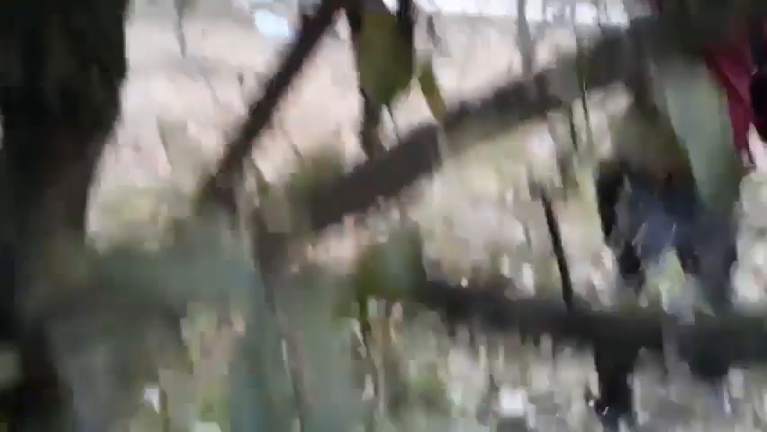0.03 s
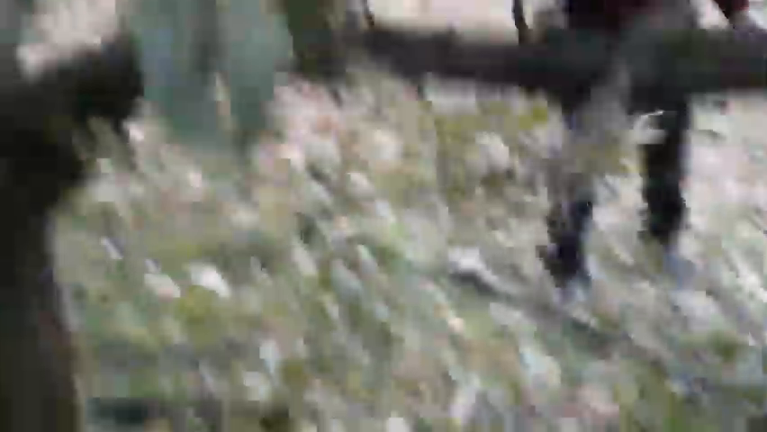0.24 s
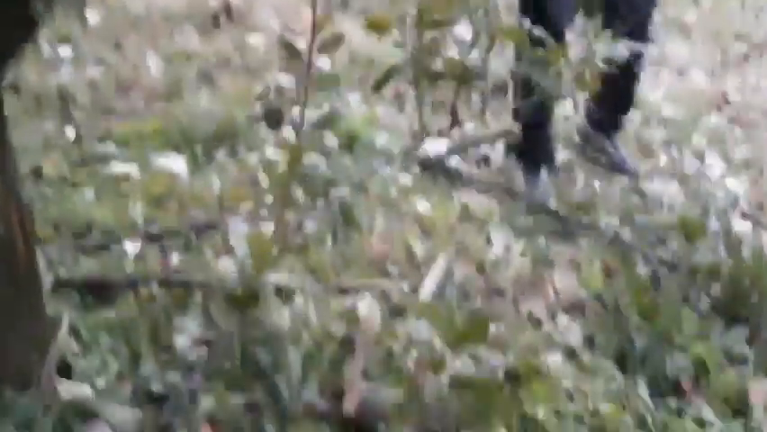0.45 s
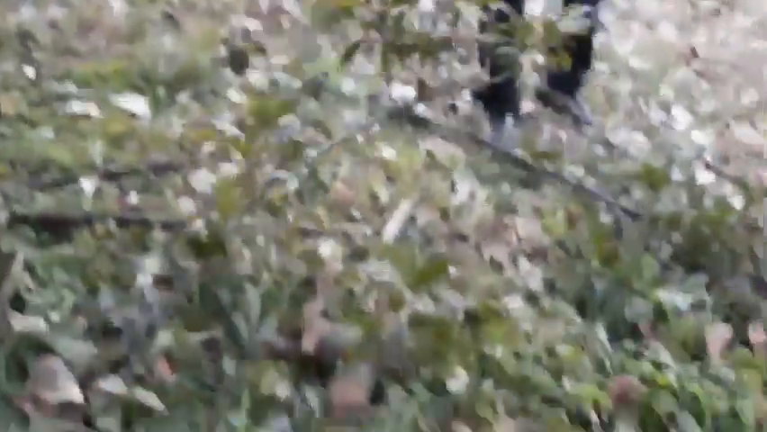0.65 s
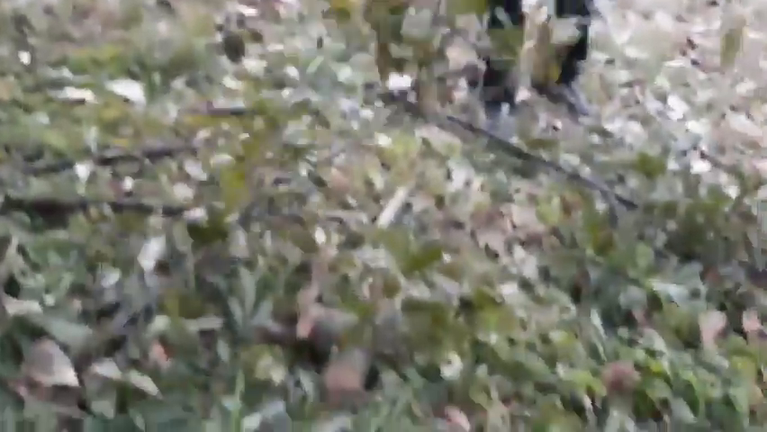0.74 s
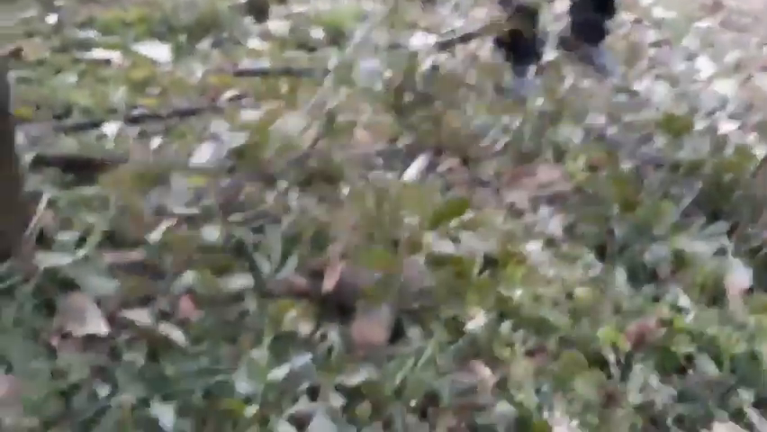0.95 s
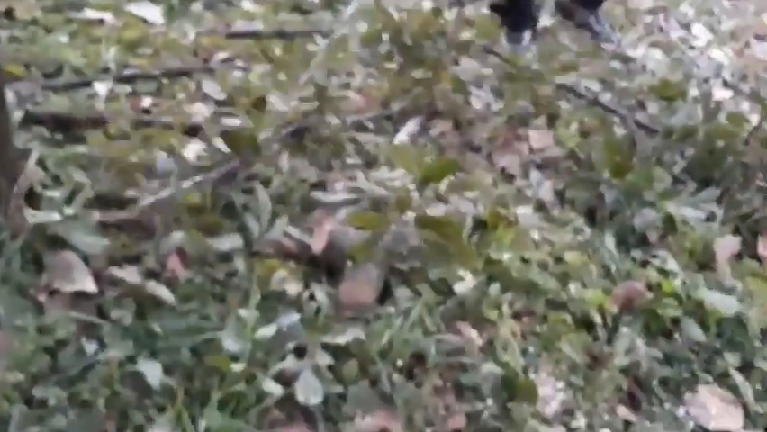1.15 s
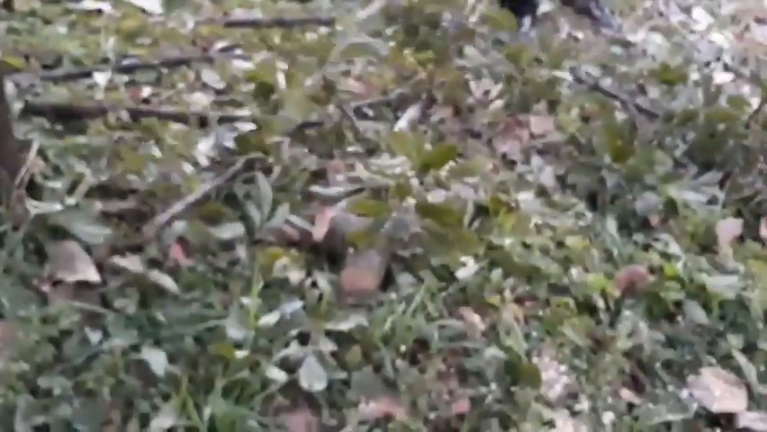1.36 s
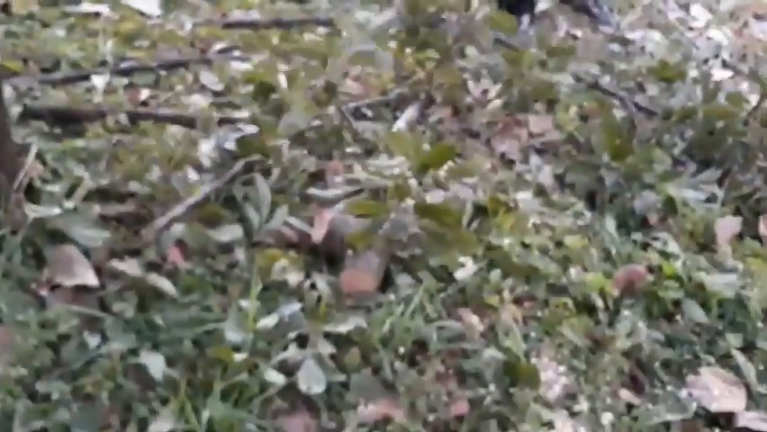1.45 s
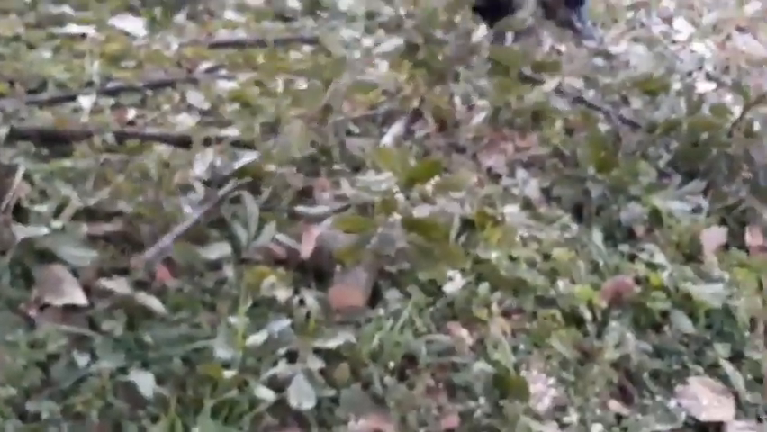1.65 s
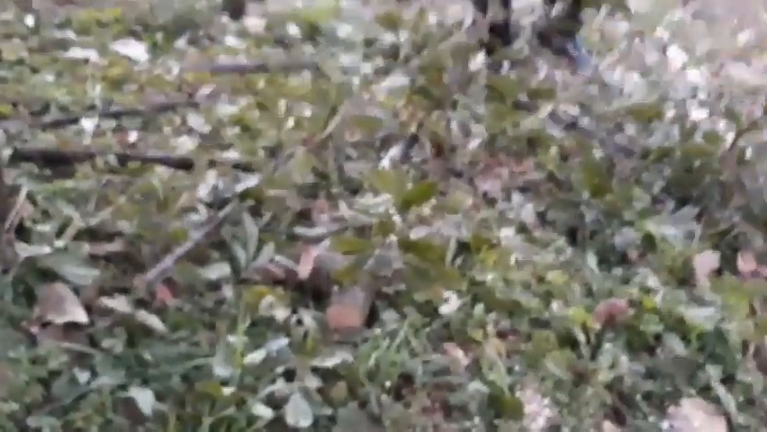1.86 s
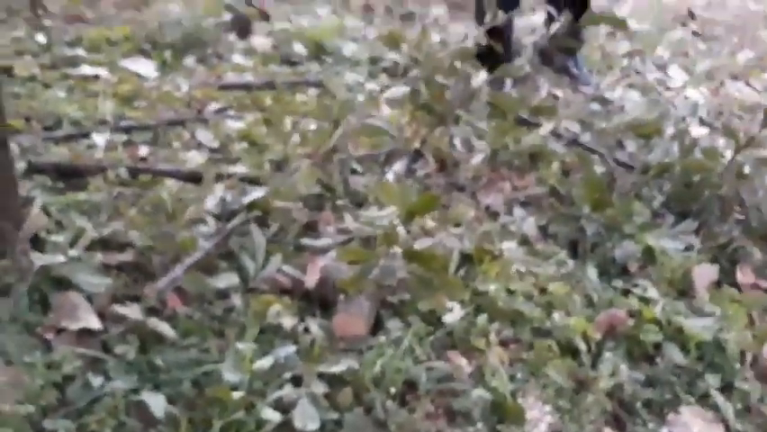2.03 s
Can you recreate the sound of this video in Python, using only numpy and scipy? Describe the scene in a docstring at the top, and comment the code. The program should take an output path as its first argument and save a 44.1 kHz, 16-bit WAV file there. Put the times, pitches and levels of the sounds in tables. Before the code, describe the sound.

Electric saw motor whines up from a click, rasps through wood, then winds down and clacks off

```python
"""Electric chain saw in an orchard

The trigger clicks; the chain winds up, bites into a branch, runs free and winds down to further clicks.
Chain and wood are noise puffs, one per link or tooth, through filters and resonances; the whine is sines.
Noise makes leaves, soft steps, a last dull click and background, wavering sines a low hum.
Both channels are identical."""
import sys
import numpy as np
from scipy import signal
from scipy.fft import rfft, irfft
from scipy.io import wavfile
from scipy.ndimage import map_coordinates

SR = 44100
rng = np.random.default_rng(int(sys.argv[2]) if len(sys.argv) > 2 else 0)


def put_to_file(sound):
    """Save the sound as 16-bit audio at rate SR, in the file named by the first command-line argument."""
    columns = np.atleast_2d(sound).T  # one column per channel
    safe = np.clip(columns, -1, 1)
    whole_steps = np.round(safe * 32767)
    wavfile.write(sys.argv[1], SR, whole_steps.astype(np.int16))


N = 92610


def undb(db):
    """Amplitude factor of a level in dB."""
    return 10 ** (np.asarray(db) / 20)


def unit(x):
    """Scale to an RMS of 1."""
    return x / np.sqrt(np.mean(x ** 2))


def clock():
    """Time of each sample in seconds."""
    return np.arange(N) / SR


def curve(rows):
    """Straight lines through (seconds, value) rows."""
    return np.interp(clock(), *np.array(rows).T)


def walk(rate_hz):
    """Smooth random wandering through knots of spread 1, rate_hz knots per second."""
    knots = rng.standard_normal(4096)
    return map_coordinates(knots, [clock() * rate_hz], order=3, mode="wrap")


def colour(x, points):
    """Minimum-phase filter through (Hz, dB) points that keeps the power of white noise."""
    hz, db = np.array(points).T
    size = 4096
    f = np.maximum(np.fft.rfftfreq(size, 1 / SR), 1)
    gain = undb(np.interp(np.log(f), np.log(hz), db))
    # fold the cepstrum to make the response causal
    cepstrum = irfft(np.log(gain))
    cepstrum[1:size // 2] *= 2
    cepstrum[size // 2 + 1:] = 0
    response = irfft(np.exp(rfft(cepstrum)))
    return signal.fftconvolve(x, response / np.linalg.norm(response))[:N]


def pulses(rate_hz, scatter_db, jitter_cycles):
    """One impact per cycle, uneven in size and in time."""
    turns = np.cumsum(rate_hz) / SR
    size, late = rng.standard_normal((16000, 2))[:int(turns[-1])].T
    at = np.interp(np.arange(len(size)) + jitter_cycles * late, turns, np.arange(N))
    return np.bincount(at.astype(int), undb(scatter_db * np.minimum(size, 2)), N)


def puffs(hits, decay_s):
    """A short burst of noise after each impact, at unit level overall."""
    envelope = signal.lfilter([1], [1, -np.exp(-1 / (decay_s * SR))], hits)
    return unit(envelope * rng.standard_normal(N))


def bursts(rows):
    """Noise that starts sharply and dies away for each (start s, dB, decay s) row."""
    t = clock()
    envelope = sum(undb(db) * (t >= s) * np.exp(-np.abs(t - s) / decay_s) for s, db, decay_s in rows)
    return rng.standard_normal(N) * envelope


def ring(x, hz, width_hz):
    """One resonance, at unit level."""
    return unit(signal.lfilter(*signal.iirpeak(hz, hz / width_hz, SR), x))


# Distant background colour. Each row: frequency in Hz, gain in dB.
AIR_COLOUR = [(25, -19), (50, -11), (75, 2), (120, -1.5), (180, -1), (260, -6.5), (500, -6), (1000, -19.5),
              (4000, -21)]
AIR_DB = -48


def background():
    """Steady coloured noise."""
    return undb(AIR_DB) * colour(rng.standard_normal(N), AIR_COLOUR)


# Distant hum. Each row: frequency in Hz, mean level in dB.
HUM_TONES = [(71, -56), (87, -59), (143, -63), (214, -60)]


def hum():
    """Low sines that waver in level and phase."""
    out = np.zeros(N)
    for hz, db in HUM_TONES:
        level = np.sqrt(2) * undb(db + 2 * walk(9.2))
        out += level * np.sin(2 * np.pi * hz * clock() + .6 * walk(5.1))
    return out


# Crisp leaves. Each row: start in seconds, level in dB, decay in seconds.
CRUNCHES = [(.015, -42, .004), (.036, -41, .004), (.071, -36, .007), (.122, -41, .005), (1.925, -42, .004),
            (2.015, -46, .015)]
# Leaf colour. Each row: frequency in Hz, gain in dB.
LEAF_COLOUR = [(300, -4.5), (600, -2.5), (1200, -3), (3200, -5.5), (4600, 1), (6000, 2.5), (7800, -3),
               (9800, -32.5), (13000, -11.5), (15500, -33)]
LEAVES_DB, LEAF_SWELL_DB, LEAF_SWELL_HZ = -44, 1.2, 25.77
LEAF_RATE_HZ, LEAF_SCATTER_DB, LEAF_JITTER_CYCLES, LEAF_DECAY_S = 500., 3.5, .98, .0045


def leaves():
    """Many small irregular impacts rustle, with single crunches among them."""
    hits = pulses(np.full(N, LEAF_RATE_HZ), LEAF_SCATTER_DB, LEAF_JITTER_CYCLES)
    rustle = puffs(hits, LEAF_DECAY_S)
    swell = undb(LEAVES_DB + LEAF_SWELL_DB * walk(LEAF_SWELL_HZ))
    return colour(rustle * swell + bursts(CRUNCHES), LEAF_COLOUR)


# Soft steps in the undergrowth, and in the last row a short, dull click.
# Each row: start in seconds, level in dB, decay in seconds.
STEPS_AND_LAST_CLICK = [(.02, -42.5, 0.06), (.066, -45, 0.0053), (.8, -38, 0.01), (2.092, -32, .003)]
# Colour of both. Each row: frequency in Hz, gain in dB.
DULL_COLOUR = [(60, -12), (200, -3), (420, 9), (800, -6), (2500, -29), (8000, -38)]


def steps_and_last_click():
    """Decaying noise bursts with a dull colour."""
    return colour(bursts(STEPS_AND_LAST_CLICK), DULL_COLOUR)


# Clicks of trigger and drive. Each row: start in seconds, level in dB, decay in seconds.
CLICKS = [(.146, -38, .004), (.1578, -15, .0035), (.164, -18, .003), (.1735, -24, .003),
          (1.833, -12.5, .0017), (1.8365, -22, .004)]
# Click colour. Each row: frequency in Hz, gain in dB.
CLICK_COLOUR = [(200, -20), (400, -9), (620, 1), (1400, -1), (2200, 4), (3500, 2), (6300, 0), (8500, -11),
                (10000, -20), (15000, -23)]
# Ring after each click. Each row: nominal frequency in Hz, level against the click in dB, T60 in seconds.
CLICK_RING = [(614, -22, .15), (5120, -20, .11), (12790, -23, .15)]


def trigger():
    """Sharp clacks at start and stop, each with a thin, slightly detuned metallic ring."""
    out = colour(bursts(CLICKS), CLICK_COLOUR)
    for s, db, _ in CLICKS:
        age_s = np.maximum(clock() - s, 0)
        for hz, mode_db, t60_s in CLICK_RING:
            mode_hz = hz * (1 + .003 * rng.standard_normal())
            decay = np.exp(-np.log(1000) * age_s / t60_s)
            out = out + undb(db + mode_db) * decay * np.sin(2 * np.pi * mode_hz * age_s)
    return out


# Chain rattle level. Each row: time in seconds, level in dB.
RATTLE_LEVEL = [(.18, -27), (.25, -24.5), (.34, -22.5), (.44, -21.5), (.56, -23), (.74, -22.5), (1.0, -20),
                (1.46, -20), (1.6, -23), (1.68, -24.5), (1.8, -29)]
# Rattle colour. Each row: frequency in Hz, gain in dB.
RATTLE_COLOUR = [(200, -28), (520, -18.5), (670, -12.5), (940, -8), (1090, -16.5), (1280, -12.5),
                 (1520, -13.5), (1850, -2), (2450, 2.5), (2950, -6.5), (4200, 0), (5200, 1), (6000, -0.5),
                 (7700, -1.5), (8800, -9.5), (10100, -19.5), (12800, -8.5), (15500, -22)]
# Resonances of housing and cover. Each row: frequency in Hz, width in Hz, level in dB before RATTLE_LEVEL.
HOUSING = [(671, 55, -24.5), (1295, 140, -22.5), (1927, 290, -9.5), (2670, 52, -30.5), (3645, 120, -20.5),
           (3920, 30, -17.5), (4596, 390, -16.5), (5040, 370, -12), (6440, 87, -16.5), (7320, 150, -22)]
LINK_SCATTER_DB, LINK_JITTER_CYCLES, KNOCK_DECAY_S = 2.5, .08, .0007
SLIDE_SHARE, CHATTER_DB, CHATTER_HZ = 1, .4, 134.2
FREE_HZ, BRIGHT_HZ, SLOW_DULL_DB = 819, 6900, -5  # treble above BRIGHT_HZ dulls below FREE_HZ


def rattle(rate_hz):
    """Links knock on the sprocket and slide along the bar, brighter with speed; the housing rings."""
    knocks = puffs(pulses(rate_hz, LINK_SCATTER_DB, LINK_JITTER_CYCLES), KNOCK_DECAY_S)
    slide = SLIDE_SHARE * rng.standard_normal(N)
    drive = unit(knocks + slide) * undb(CHATTER_DB * walk(CHATTER_HZ))
    housing = np.zeros(N)
    for hz, width_hz, db in HOUSING:
        scrambled = drive * rng.choice([-1, 1], N)  # random signs: the modes ring independently
        housing += undb(db) * ring(scrambled, hz, width_hz)
    noise = colour(drive, RATTLE_COLOUR)
    highpass = signal.butter(2, BRIGHT_HZ, "high", fs=SR, output="sos")
    treble = signal.sosfiltfilt(highpass, noise)
    treble_gain = undb(SLOW_DULL_DB * (1 - rate_hz / FREE_HZ))
    noise = noise + treble * (treble_gain - 1)
    return (noise + housing) * undb(curve(RATTLE_LEVEL))


# Sprocket whine. Each row: time in seconds, fundamental, second and third harmonic level in dB.
WHINE_LEVEL = [(.2, -64, -56, -60), (.265, -49, -47, -48), (.305, -34.5, -39, -39), (.42, -32, -34, -29.5),
               (.56, -32, -33, -31), (.80, -33.5, -44, -32), (.85, -41, -43, -28.5), (1.15, -37, -40, -27),
               (1.44, -40, -40, -30), (1.475, -30.5, -37, -32), (1.62, -34, -36, -31),
               (1.70, -33.5, -37, -34), (1.755, -48, -51, -52), (1.82, -66, -60, -62)]
# Shrill sixth harmonic. Each row: time in seconds, level in dB.
SHRILL_LEVEL = [(.36, -48), (.44, -29), (.605, -30), (.67, -39), (.9, -43), (1.45, -42), (1.55, -35),
                (1.615, -31), (1.68, -48)]
FIFTH_DB = -7.5  # against the third harmonic
FLUTTER_DB, FLUTTER_HZ = 2.0, 90


def whine(rate_hz):
    """Harmonics of the link rate: a clean fundamental under fluttering overtones."""
    phase = 2 * np.pi * np.cumsum(rate_hz) / SR
    times, *columns = np.array(WHINE_LEVEL).T
    first_db, second_db, third_db = (np.interp(clock(), times, db) for db in columns)
    overtones = [(2, second_db), (3, third_db), (5, third_db + FIFTH_DB), (6, curve(SHRILL_LEVEL))]
    tone = undb(first_db) * np.sin(phase)
    for k, db in overtones:
        level = undb(db + FLUTTER_DB * walk(FLUTTER_HZ))
        tone = tone + level * np.sin(k * phase + rng.uniform(0, 2 * np.pi))
    return np.sqrt(2) * tone


# Tearing wood colour. Each row: frequency in Hz, gain in dB.
WOOD_COLOUR = [(200, -20), (340, -26), (500, -10.5), (720, 3.5), (950, -3), (1130, -2), (1400, 5),
               (1750, 2), (2200, 2.5), (2750, -1), (3100, -7), (4500, -1.5), (7500, 2), (10100, -17.5),
               (12800, -11.5), (15500, -14)]
# Resonances of bar and branch. Each row: frequency in Hz, width in Hz, level against each other in dB.
BAR_MODES = [(389.3, 18, -5), (731, 25, -1.5), (1370, 190, -17), (2240, 110, 7), (2440, 120, 7),
             (3005, 150, 8), (3830, 21, 0)]
WOOD_DB, BAR_DB = -22, -25.5  # at a bite of 0 dB
TOOTH_SCATTER_DB, TOOTH_JITTER_CYCLES, TEAR_DECAY_S = 2.5, .07, .0019
JUDDER_DB, JUDDER_HZ = 1.3, 260


def cut(rate_hz, bite):
    """Every second link carries a tooth that tears the wood and rings bar and branch."""
    teeth = pulses(rate_hz / 2, TOOTH_SCATTER_DB, TOOTH_JITTER_CYCLES)
    teeth = teeth * undb(JUDDER_DB * walk(JUDDER_HZ))
    tear = puffs(teeth, TEAR_DECAY_S)
    drive = tear + .5 * unit(teeth)
    body = sum(undb(db) * ring(drive, hz, width_hz) for hz, width_hz, db in BAR_MODES)
    return bite * (undb(WOOD_DB) * colour(tear, WOOD_COLOUR) + undb(BAR_DB) * unit(body))


TREES_DB, TREES_DECAY_S, TREES_LAG_S = -11, .022, .004


def trees(x):
    """A brief scatter from the ground and nearby trunks: a decaying noise response added to the sound."""
    t = clock()[:SR // 5]
    echoes = rng.standard_normal(len(t)) * (t > TREES_LAG_S) * np.exp(-t / TREES_DECAY_S)
    return x + undb(TREES_DB) * signal.fftconvolve(x, echoes / np.linalg.norm(echoes))[:N]


# Nominal chain speed. Each row: time in seconds, links over the sprocket per second.
CHAIN_SPEED = [(.16, 270), (.2, 400), (.25, 525), (.306, 625), (.39, 775), (.422, 811), (.53, 819),
               (.79, 818), (.82, 805), (.885, 794), (.935, 812), (1.01, 792), (1.2, 804), (1.33, 809),
               (1.42, 812), (1.468, 851), (1.6, 831), (1.626, 812), (1.696, 662), (1.742, 570),
               (1.835, 390)]
# How hard the teeth bite into the branch. Each row: time in seconds, level in dB.
BITE_LEVEL = [(.76, -26), (.83, -5), (.89, -5), (.93, -5), (.98, 0.5), (1.05, 1.5), (1.18, -3),
              (1.28, -0.5), (1.44, 0), (1.462, -2), (1.485, -28)]
START_S, STOP_S, SPIN_UP_S, BRAKE_S = .1453, 1.838, .011, .0046  # BRAKE_S: decay time constant
WHINE_WOBBLE, CUT_WOBBLE = .001, .005  # shares of chain speed


def scene():
    """The saw runs between the start and stop clicks; its speed wobbles more as it bites."""
    t = clock()
    fade_in = np.clip((t - START_S) / SPIN_UP_S, 0, 1)
    running = fade_in * np.exp(-np.maximum(t - STOP_S, 0) / BRAKE_S)
    bite = undb(curve(BITE_LEVEL))
    wobble = WHINE_WOBBLE * walk(50) + CUT_WOBBLE * bite * walk(60)
    rate_hz = curve(CHAIN_SPEED) * (1 + wobble)
    clatter = running * (rattle(rate_hz) + cut(rate_hz, bite)) + trigger()
    saw = trees(clatter) + running * whine(rate_hz)
    surroundings = leaves() + hum() + steps_and_last_click() + background()
    return np.tile(saw + surroundings, (2, 1))


TOP_HZ = 15700


def record(dry):
    """Soft saturation rounds the highest peaks; a steep low-pass cuts the top."""
    lowpass = signal.ellip(12, .2, 80, TOP_HZ, fs=SR, output="sos")
    return signal.sosfilt(lowpass, np.tanh(dry))


dry = scene()
out = record(dry)
put_to_file(out)
```